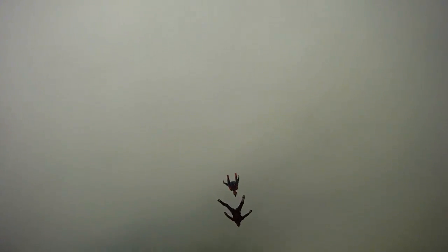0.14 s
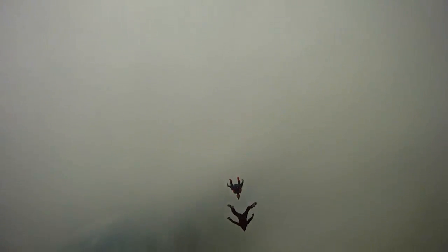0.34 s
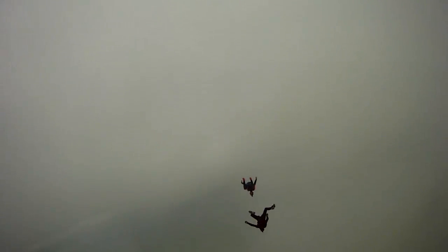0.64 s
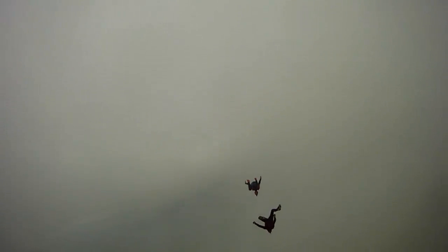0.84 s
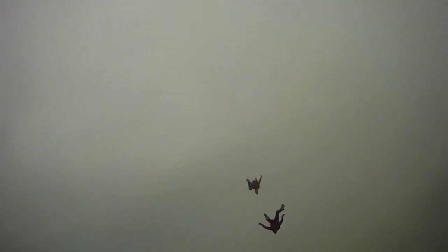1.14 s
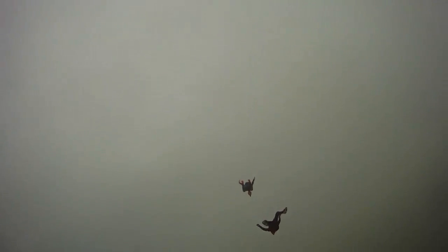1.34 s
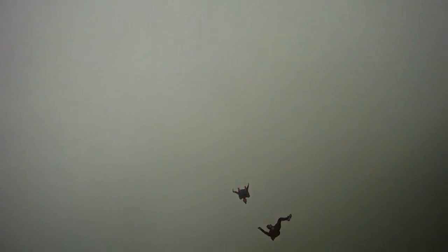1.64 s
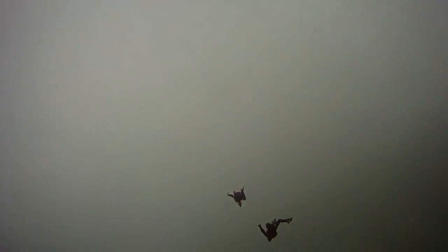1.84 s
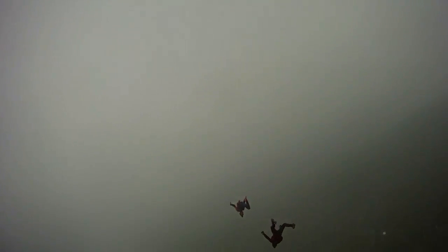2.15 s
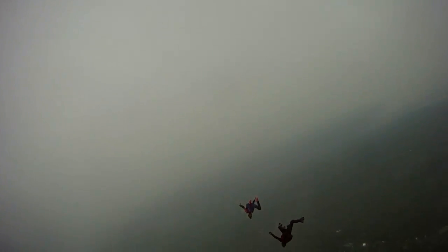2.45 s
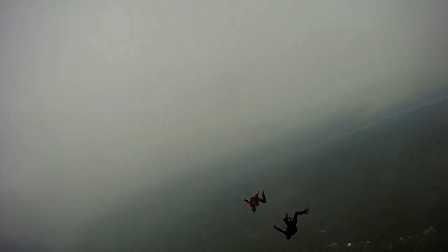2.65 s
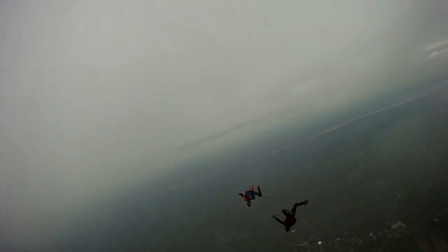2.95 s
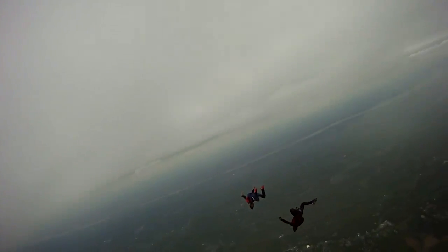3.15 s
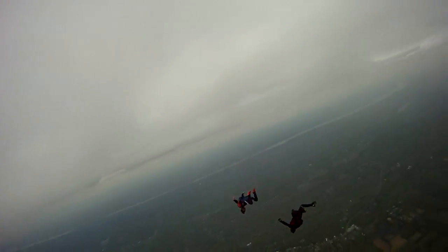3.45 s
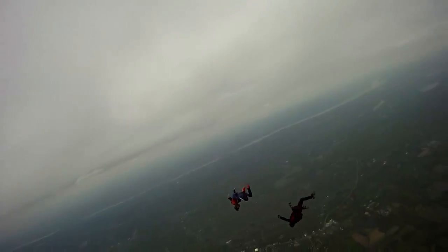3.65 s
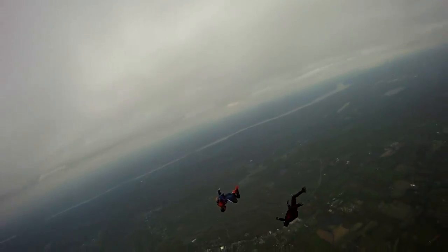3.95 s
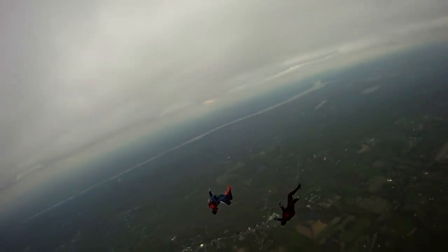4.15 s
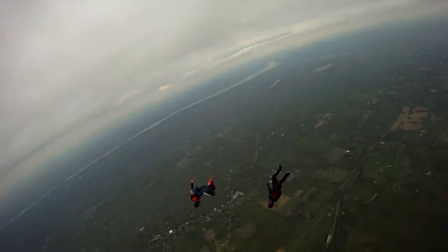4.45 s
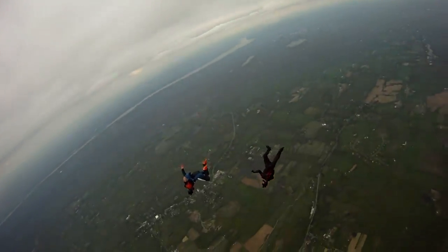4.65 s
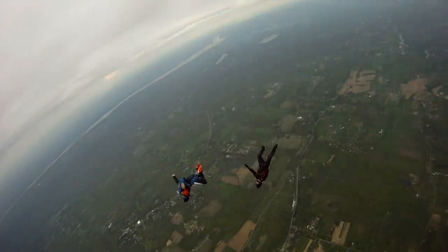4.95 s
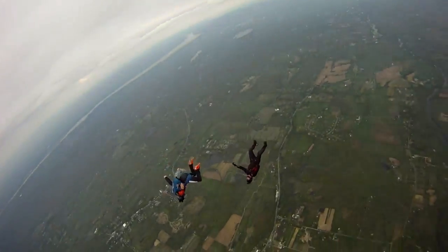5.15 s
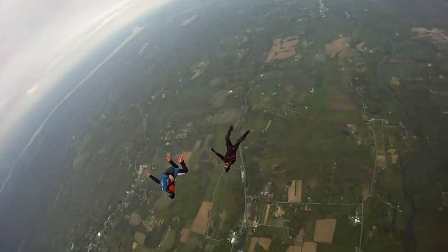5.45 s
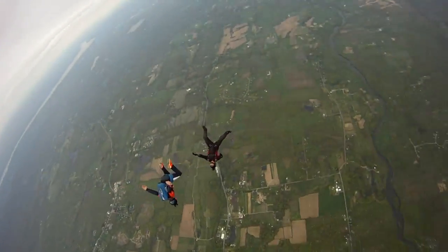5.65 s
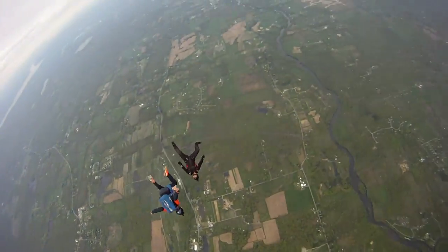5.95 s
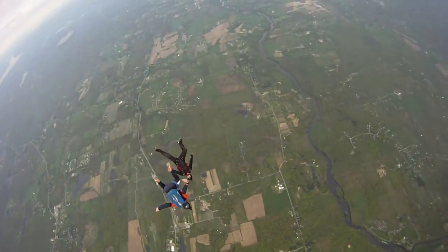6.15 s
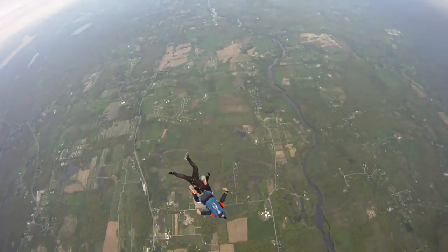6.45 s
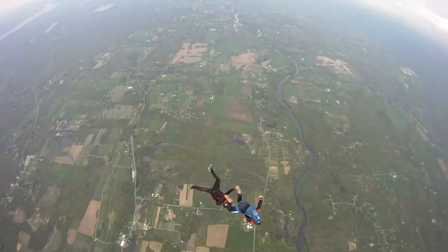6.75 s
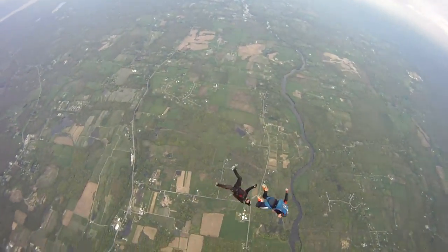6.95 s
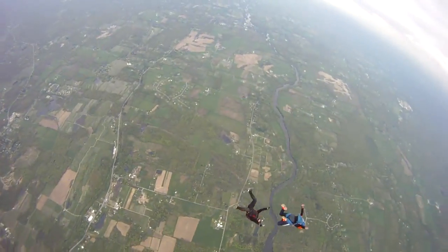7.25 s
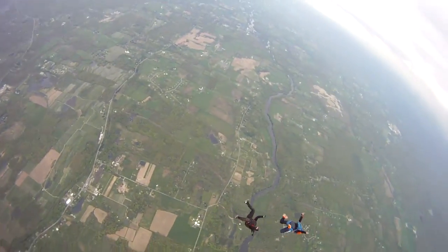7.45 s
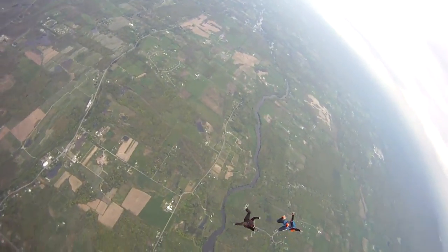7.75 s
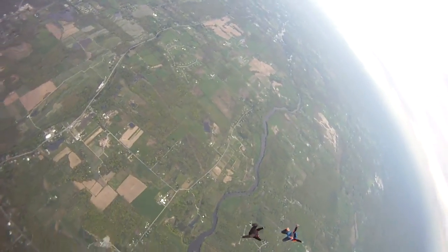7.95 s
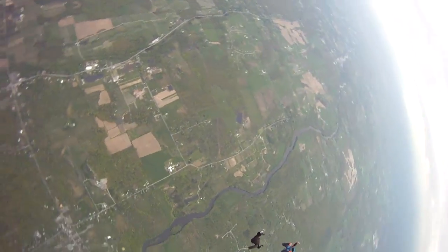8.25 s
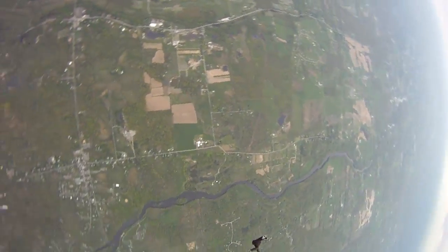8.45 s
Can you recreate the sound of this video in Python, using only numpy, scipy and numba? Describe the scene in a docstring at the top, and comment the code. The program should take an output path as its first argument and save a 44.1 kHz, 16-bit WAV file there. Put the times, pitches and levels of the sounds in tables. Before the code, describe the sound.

High in open sky, two skydivers fall while wind roars steadily over a helmet camera in a closed housing. The first four seconds are boxed-in and midrange, with faint hums, moans and a hollow howl. Then the head turns, and the rush becomes brighter and hissy, with deep buffeting gusts. Brief fluttering whistles appear near the end. The sound is close, mono and gritty.

```python
"""High in the open sky, in freefall: wind roars over a helmet camera, with a low rush round the helmet.
The air is noise shaped by the resonances of the closed housing; a flap hums, an edge moans, a cavity howls
and gaps whistle, all as wavering sine tones. After the head turns, the stream hits the port: the sound is
brighter, with heavy buffeting. The camera rides its gain, samples slowly and holds each sample,
which mirrors the roar into the treble."""
import sys
import numpy as np
from scipy import signal
from scipy.fft import rfft, irfft, next_fast_len
from scipy.io import wavfile
from scipy.ndimage import uniform_filter1d, map_coordinates
from numba import njit

SR = 44100
rng = np.random.default_rng(int(sys.argv[2]) if len(sys.argv) > 2 else 0)


def transcribe(u):
    """Save the signal u as a 16-bit wav file named by the first command-line argument.

    u: samples, shape (n,) or (channels, n), limited to [-1, 1]; the rate is SR.
    q: integer samples, one column per channel.
    """
    v = np.clip(np.atleast_2d(u).T, -1, 1)
    q = np.round(v * 32767).astype(np.int16)
    wavfile.write(sys.argv[1], SR, q)


N = 379260

# All levels are those before the camera's gain.
# strength of the air stream, before its small eddies: t/s, level/dB
STREAM = [(0.0, -15.5), (1.3, -14.5), (1.7, -16.5), (2.9, -14), (3.5, -16.5), (4.1, -18), (4.4, -12.5),
          (5.1, -14.5), (5.46, -11), (6.55, -15), (6.97, -14.5), (7.88, -14.5), (8.48, -15), (8.6, -18.5)]
# low rush of air round the helmet: t/s, level/dB
HELMET = [(0.0, -32.5), (0.21, -31), (1.12, -31), (1.77, -37), (2.42, -30.5), (2.85, -28.5), (3.21, -35.5),
          (3.7, -34.5), (4.38, -28.5), (4.7, -34.5), (5.25, -35.5), (5.6, -29), (6.1, -30.5), (6.5, -32.5),
          (6.9, -35.5), (7.35, -32), (7.71, -33), (8.31, -32.5), (8.48, -36), (8.6, -44)]
# colours of the noise, with the port sheltered (lee) and facing the stream: f/Hz, relative level/dB
ROAR_LEE = [(460, -29.5), (780, -22.5), (999, -8), (1070, -7), (1120, -5.5), (1230, -13.5), (1440, -2.5),
            (1600, -8.5), (1840, -0.5), (1910, 3.5), (2040, -2), (2260, 0.5), (2460, -11.5), (2610, -11),
            (2900, -33.5), (3770, -58), (6380, -120)]
ROAR_FACING = [(460, -48), (780, -25), (866, -13), (895, -11.5), (972, -18), (1080, -6), (1200, -6.5),
               (1400, -5), (1570, -2), (1750, -8.5), (2050, 0.5), (2610, -6.5), (2900, -11), (3770, -28),
               (6380, -120)]
HISS_LEE = [(1620, -68), (2750, -16), (2900, -15), (3060, -5.5), (3260, -4.5), (3430, -4), (3550, 2.5),
            (3650, -4), (3950, -13.5), (4250, -17.5), (4970, -17), (5550, -22.5), (6000, -39), (7800, -63),
            (13200, -120)]
HISS_FACING = [(1620, -36), (2750, -13.5), (2900, -11), (3260, -2), (3950, -3), (4740, -9), (5180, -9),
               (6000, -19), (7800, -48), (13200, -120)]
BODY_LEE = [(260, -35), (440, -11.5), (466, -15), (516, 3), (566, -2), (639, 1), (772, -6), (870, 1),
            (1130, -11), (1910, -120)]
BODY_FACING = [(260, -37), (440, -7.5), (628, -5), (704, -7), (803, -7), (870, -4.5), (1130, -38),
               (1910, -120)]
THUD_LEE = [(11, -40), (18, -24), (43, -3), (65, -5), (97, 7.5), (170, -10.5), (220, -48), (370, -120)]
THUD_FACING = [(11, -45), (18, -17), (102, -1), (119, 2.5), (170, -12.5), (220, -39), (370, -120)]
# colour of the growl, the same throughout: f/Hz, relative level/dB
GROWL_COLOUR = [(88, -9), (150, -3), (183, -2), (296, -1), (460, -4.5), (600, -21), (1010, -120)]
# gusts and lulls at the port: t/s, half length/s, change of buffeting/dB, change of hiss/dB
GUSTS = [(1.1, .3, 0, -1), (1.75, .1, -3, 0.5), (3.5, .12, -5, 1.7), (4.418, 0.19, 9, -1.5),
         (4.75, .12, -5, 1), (5.25, .05, 8, 2), (5.45, 0.24, 1.5, 1), (5.9, 0.52, 2, 1.5),
         (6.624, 0.34, 5, 2), (6.95, 0.25, -6, -0.2), (8.38, 0.059, 5.5, -1), (8.5, 0.12, 0.3, 5.5),
         (8.6, .05, -8, 2)]
# howls of a housing cavity, before flutter: start t/s, length/s, f/Hz, level/dB
HOWLS = [(0, 2.15, 1096, -33), (2.5, 1.14, 1104, -32.5), (6.75, 1.56, 870, -35.5)]
# hums of a flap, before flutter: start t/s, length/s, starting f/Hz, starting level/dB, fade/(dB per s)
HUMS = [(0.267, .92, 88.1, -34, -6), (2.395, 0.4, 87.5, -34, -2), (3.281, 0.81, 85.9, -33, -3)]
# moans of an edge, before flutter: start t/s, length/s, starting f/Hz, glide/(Hz per s), level/dB
MOANS = [(1.221, 0.3, 312.6, -200, -37), (1.578, 0.21, 270, 219, -41), (3.0, .3, 305, 60, -41),
         (3.419, .12, 327, 10, -41.5), (3.898, .17, 299.4, -180, -38)]
# sudden drops in level: t/s, recovery time/s
DIPS = [(1.74, .05), (2.69, 0.036), (3.19, 0.042), (3.52, .08), (4.005, 0.28), (6.859, .04), (7.58, .05),
        (8.375, .04), (8.538, .05)]
# whistles of the gaps, before flutter: start t/s, length/s, starting f/Hz, glide/(Hz per s), level/dB
WHISTLES = [(4.7, 0.062, 5080, -700, -25), (4.772, 0.039, 5160, 2504, -27), (8.383, .012, 3320, 10, -17.5),
            (8.483, .03, 3230, 10, -21), (8.52, 0.017, 3310, 10, -11), (8.549, .07, 3300, 10, -15)]

TURN_S, TURN_TAKES_S = 4.09, 0.2  # the head turns the port into the stream
LEE_SHARE, FACING_SHARE = 0.066, 0.83  # share of the facing colour before and after the turn
HISS_LEE_DB, HISS_FACING_DB = -13.5, -7  # relative to the stream
HISS_TURN_S, HISS_TAKES_S = 4.27, 0.23  # the hiss opens later
THUD_LEE_DB, THUD_FACING_DB = -40, -30  # before gusts and wavering
THUD_RISES_S, THUD_RISE_TAKES_S = 4.65, 0.3  # the lumps keep their deep colour through the first gust
GROWL_LEE_DB, GROWL_FACING_DB = -4, -0.8  # relative to the low rush, before gusts
GROWL_PER_GUST = 0.15  # dB of growl for each dB of buffeting
HUM_SAG_HZ_PER_S = 8
SWELL_DB, SWELL_S, DROP_DB = 3, 0.076, 0.5  # shape of each dip before smoothing
CEILING, ATTACK_S, RELEASE_S = 0.63, 0.00049, 0.07  # the camera's gain control
SAMPLE_HZ, TOP_HZ = 12000, 15330  # the camera's slow sample rate and its band limit


def amp(db):
    """Turn a level in dB into a gain."""
    return 10 ** (np.asarray(db) / 20)


def unit(x):
    """Scale x to an average strength (rms) of 1."""
    return x / np.sqrt(np.mean(x ** 2) + 1e-20)


def curve(rows):
    """Join the points of a two-column table into one value per sample."""
    seconds, values = np.transpose(rows)
    return np.interp(np.arange(N) / SR, seconds, values)


def wobble(rate):
    """Draw a smooth random curve through `rate` random points a second."""
    points = rng.standard_normal(int(N * rate / SR) + 4)
    return map_coordinates(points, [np.arange(N) * rate / SR])


def turned(lee, facing, at=TURN_S, takes=TURN_TAKES_S):
    """Glide from a sheltered to a facing setting as the head turns."""
    progress = (1 + np.tanh((np.arange(N) / SR - at) / takes)) / 2
    return lee + (facing - lee) * progress


def filtered(x, response):
    """Change the strength of each frequency in x by the gain response(hz)."""
    size = next_fast_len(N + 8192)  # spare room for ringing
    spectrum = rfft(x, size) * response(np.fft.rfftfreq(size, 1 / SR))
    return irfft(spectrum, size)[..., :N]


def coloured(noise, rows):
    """Give noise the spectrum of a colour table, at rms 1."""
    hz_points, db_points = np.transpose(rows)

    def response(hz):
        return amp(np.interp(np.log(hz + 1), np.log(hz_points), db_points, -120, -120))

    return unit(filtered(noise, response))


def rush(lee, facing, share, patchy_db):
    """Turbulent air as patchy noise, blended from its sheltered to its facing colour."""
    bands = signal.stft(rng.standard_normal(N), nperseg=512)[2]
    patches = uniform_filter1d(rng.standard_normal(bands.shape), size=5, axis=0)  # across frequency
    patches = uniform_filter1d(patches, size=8, axis=1)  # across time
    noise = signal.istft(bands * amp(patchy_db * unit(patches)), nperseg=512)[1][:N]
    return (1 - share) * coloured(noise, lee) + share * coloured(noise, facing)


def tone(start, length, hz, glide, db, width_hz, edge, fade=0):
    """A wind tone: a sine that swells, holds or fades, then dies, with wandering pitch."""
    late = np.arange(N) / SR - start
    # the swell comes before start and the dying away after length, each lasting edge seconds
    gate = np.clip(np.minimum(late, length - late) / edge + 1, 0, 1) ** 2
    pitch = hz + glide * late + width_hz * wobble(3 * width_hz)
    phase = 2 * np.pi * np.cumsum(pitch) / SR
    level = amp(db + fade * np.clip(late, 0, length))
    return np.sqrt(2) * gate * level * np.sin(phase)


def roar(stream_db, eddies_db, share):
    """The stream's turbulence excites the resonances of the closed housing."""
    return amp(stream_db + eddies_db) * rush(ROAR_LEE, ROAR_FACING, share, patchy_db=0.81)


def hiss(stream_db, eddies_db, gust_db, share):
    """Bright noise of the stream, sharing some of the roar's eddies and flickering by itself."""
    turn_db = turned(HISS_LEE_DB, HISS_FACING_DB, HISS_TURN_S, HISS_TAKES_S)
    flicker_db = 0.17 * eddies_db + 0.36 * wobble(14)
    level = amp(stream_db + turn_db + gust_db + flicker_db)
    return level * rush(HISS_LEE, HISS_FACING, share, patchy_db=0.0)


def body(body_db, share):
    """The low rush of air round the helmet."""
    return amp(body_db) * rush(BODY_LEE, BODY_FACING, share, patchy_db=0.65)


def growl(body_db, gust_db, share):
    """Deep noise that follows the low rush and grows a little with each gust."""
    level = amp(body_db + turned(GROWL_LEE_DB, GROWL_FACING_DB) + GROWL_PER_GUST * gust_db)
    return level * rush(GROWL_COLOUR, GROWL_COLOUR, share, patchy_db=0.4)


def thud(gust_db):
    """Buffeting: lumps of pressure at the port, as very low wavering noise."""
    level = amp(turned(THUD_LEE_DB, THUD_FACING_DB) + gust_db + 0.75 * wobble(5.8))
    share = turned(0, 0.87, THUD_RISES_S, THUD_RISE_TAKES_S)
    return level * rush(THUD_LEE, THUD_FACING, share, patchy_db=1.0)


def gusts():
    """Bell-shaped rises and falls of the buffeting and of the hiss, in dB."""
    t = np.arange(N) / SR
    total = np.zeros((2, N))
    for s, half, thud_db, hiss_db in GUSTS:
        bell = np.exp(-((t - s) / half) ** 2)
        total += np.outer([thud_db, hiss_db], bell)
    return total


def stream():
    """All the noise of the air: roar, hiss, low rush, growl and buffeting."""
    stream_db, body_db = curve(STREAM), curve(HELMET)
    thud_gust_db, hiss_gust_db = gusts()
    share = turned(LEE_SHARE, FACING_SHARE)
    eddies_db = 0.37 * wobble(30) + 0.32 * wobble(120)
    bright = roar(stream_db, eddies_db, share) + hiss(stream_db, eddies_db, hiss_gust_db, share)
    low = body(body_db, share) + growl(body_db, thud_gust_db, share) + thud(thud_gust_db)
    return bright + low


def howl():
    """A cavity of the housing resonates in the wind, higher while sheltered."""
    howls = sum(tone(s, length, hz, 0, db, width_hz=36, edge=0.24) for s, length, hz, db in HOWLS)
    return amp(3.5 * wobble(35)) * howls


def hum():
    """A flap shivers in the stream and slows, so its pitch sags."""
    hums = sum(tone(s, length, hz, -HUM_SAG_HZ_PER_S, db, width_hz=2.8, edge=0.09, fade=fade)
               for s, length, hz, db, fade in HUMS)
    return amp(0.8 * wobble(6)) * hums


def moan():
    """An edge moans in the wind, each moan gliding up or down in pitch."""
    moans = sum(tone(*row, width_hz=5, edge=0.05) for row in MOANS)
    return amp(1.5 * wobble(17)) * moans


def dips():
    """Gain that swells, drops sharply and climbs back."""
    t, db = np.arange(N) / SR, np.zeros(N)
    for s, recovery in DIPS:
        late = t - s
        swell = SWELL_DB * np.exp(-abs(late) / SWELL_S)
        drop = -DROP_DB * np.exp(-abs(late) / recovery)
        db += np.where(late < 0, swell, drop)
    return amp(uniform_filter1d(db, size=200))


def whistle():
    """Air whistles through gaps in the housing in short, rapidly fluttering bursts."""
    whistles = sum(tone(*row, width_hz=95, edge=0.014) for row in WHISTLES)
    return amp(3.0 * wobble(200)) * whistles


def scene():
    """Noise and tones reach one microphone and share the same swells and dips."""
    air = stream() + howl() + hum() + moan() + whistle()
    return (dips() * air)[None]


@njit
def ride(x, ceiling, attack, release):
    """Gain control: a peak over the ceiling pulls the gain down fast, then it creeps back."""
    out, want, gain = np.empty_like(x), 1.0, 1.0
    for i in range(len(x)):
        want = min(want + (1 - want) * release, ceiling / (abs(x[i]) + 1e-9))
        gain += (want - gain) * attack
        out[i] = x[i] * gain
    return out


def hold(hz):
    """Holding a sample for four steps makes a comb with a null at the sample rate."""
    return np.sinc(hz / SAMPLE_HZ) / np.sinc(hz / SAMPLE_HZ / 4)


def record(dry):
    """The camera: gain control, slow sampling with each sample held, a soft ceiling and a band limit."""
    x = ride(amp(3.0) * dry[0], CEILING, 1 / (ATTACK_S * SR), 1 / (RELEASE_S * SR))
    x = filtered(x, lambda hz: hz < SAMPLE_HZ / 2)
    # sampling copies the spectrum to both sides of the sample rate
    x = x * (1 + 2 * np.cos(2 * np.pi * SAMPLE_HZ * np.arange(N) / SR))
    x = filtered(x, hold)
    x = x / (1 + np.abs(x / 0.98) ** 8) ** (1 / 8)  # soft ceiling
    return filtered(x, lambda hz: hz < TOP_HZ)[None]


dry = scene()
out = record(dry)
transcribe(out)
```